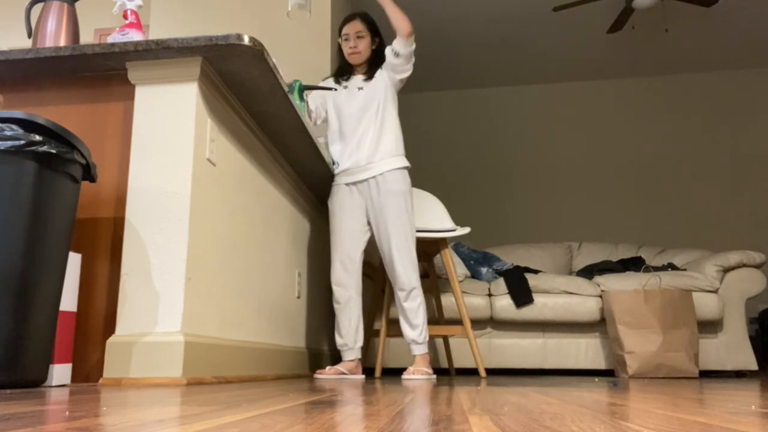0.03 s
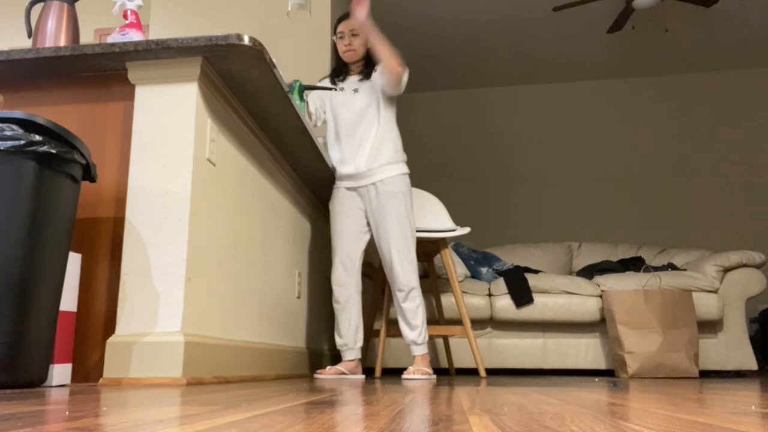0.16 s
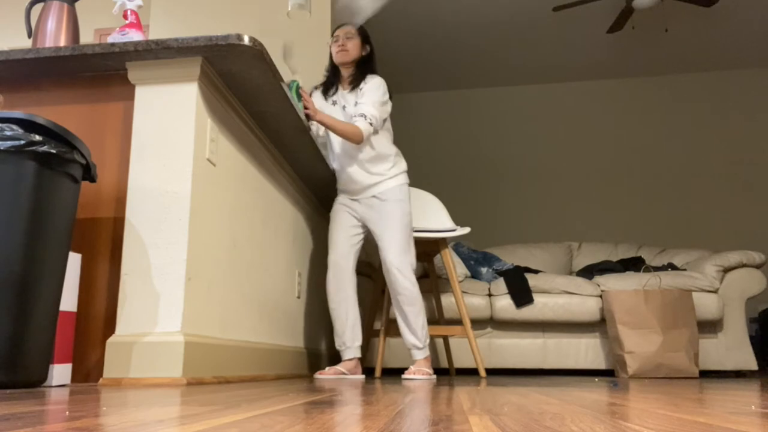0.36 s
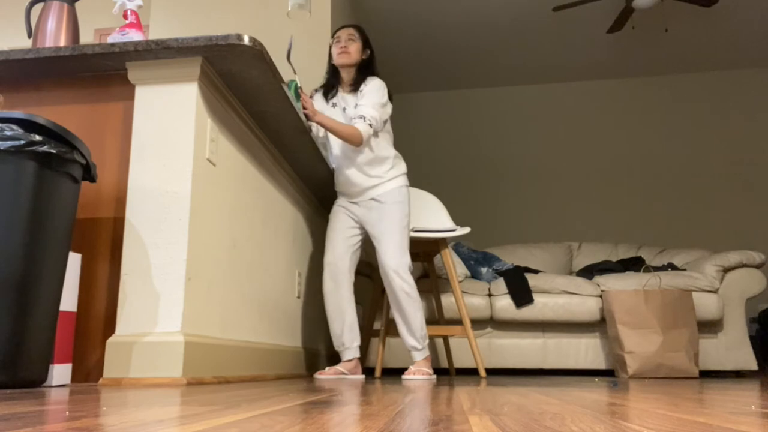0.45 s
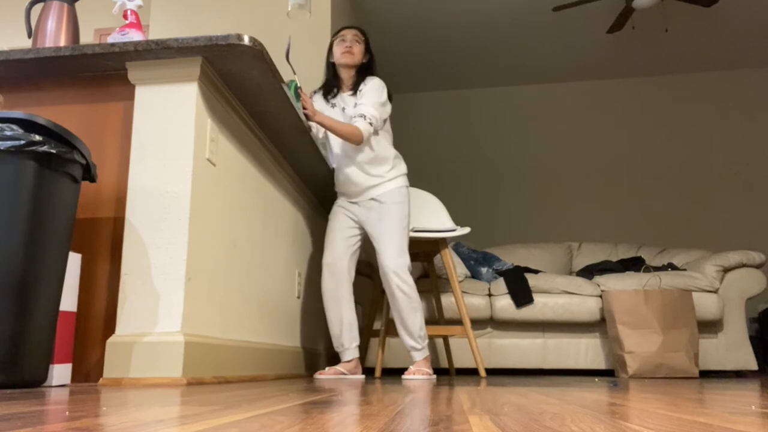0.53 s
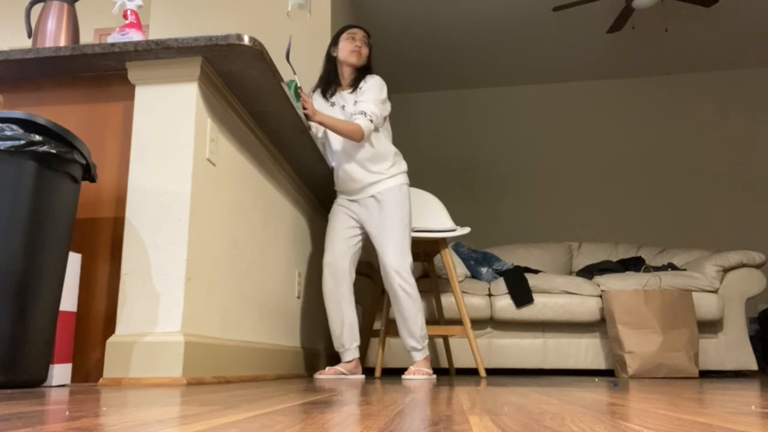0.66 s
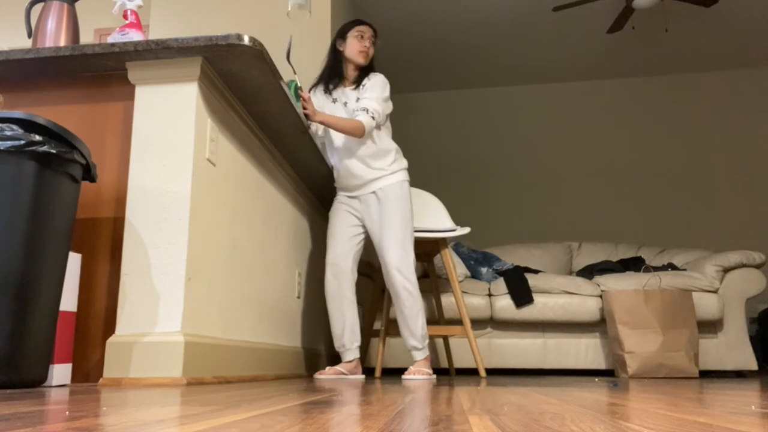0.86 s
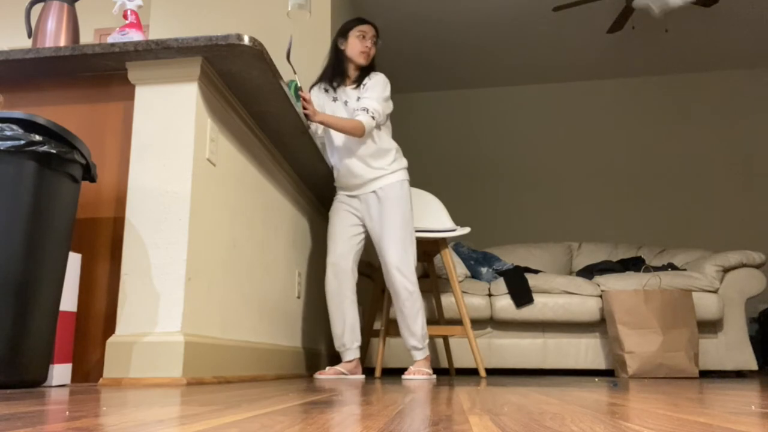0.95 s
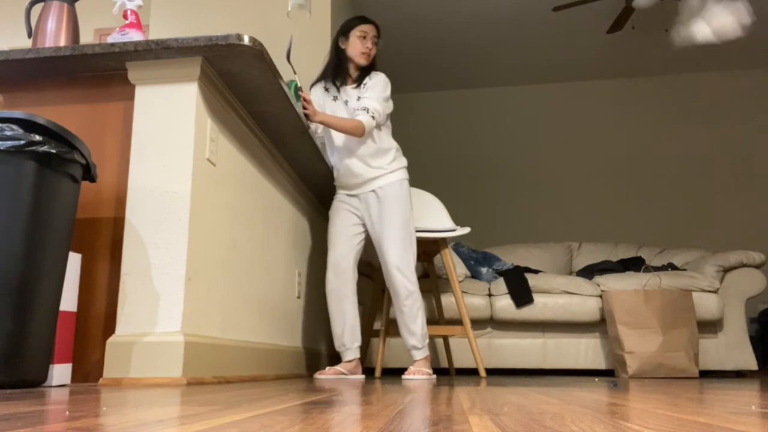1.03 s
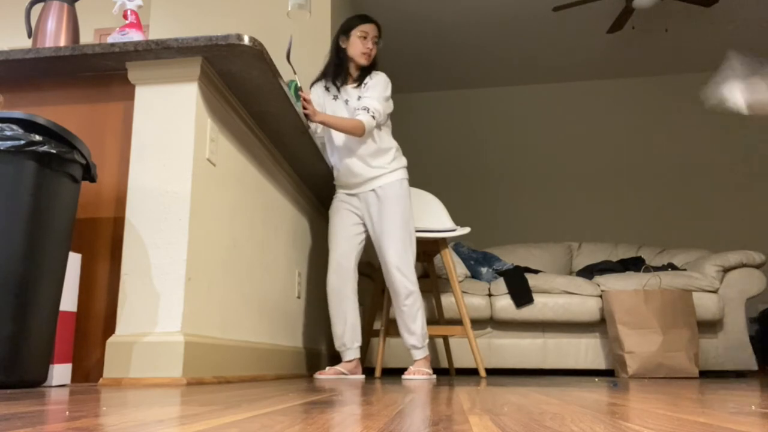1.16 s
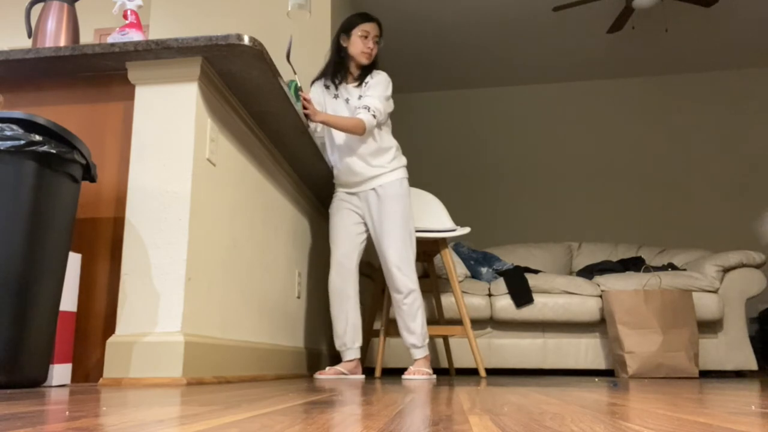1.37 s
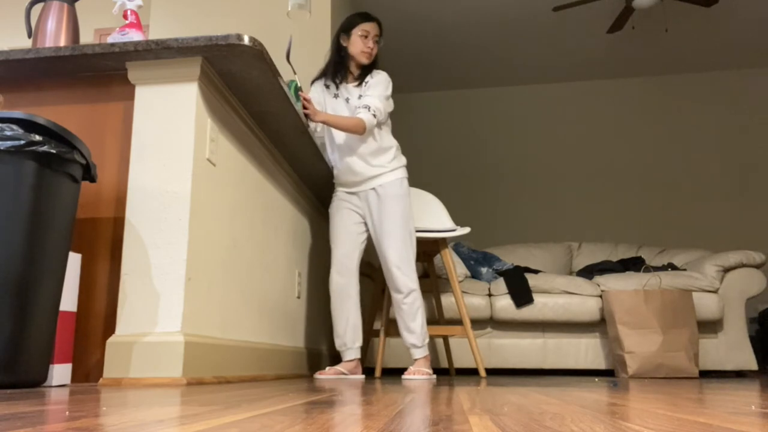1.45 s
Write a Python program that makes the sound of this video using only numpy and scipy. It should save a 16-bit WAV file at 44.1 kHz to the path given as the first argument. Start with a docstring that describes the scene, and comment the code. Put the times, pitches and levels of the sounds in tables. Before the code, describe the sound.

A booming thud of an arm hitting a counter, with a clatter, then faint taps.

```python
"""An arm lands on a kitchen counter with a booming thud that sets the hollow counter ringing.
On its way down it grazes the edge, scraping and clattering along it.
Faint taps and rustles of handling follow, over the low, beating hum of an appliance.
It all echoes in a lively living room with a wooden floor."""
import sys
import numpy as np
from scipy import signal
from scipy.fft import rfft, irfft
from scipy.io import wavfile

SR = 44100
rng = np.random.default_rng(int(sys.argv[2]) if len(sys.argv) > 2 else 0)


def master_out(mix):
    """Clip the mix to full scale and print it as 16-bit PCM to the path in sys.argv[1]."""
    frames = np.transpose(np.atleast_2d(mix))
    ceiling = np.clip(frames, -1, 1)
    pcm = np.round(ceiling * 32767).astype(np.int16)
    wavfile.write(sys.argv[1], SR, pcm)


N = 66150
FREQS = np.fft.rfftfreq(2 * N, 1 / SR)  # every tone curve has one value for each of these [Hz]


def amp(db):
    """Turns decibels into a number to multiply by."""
    return 10 ** (np.asarray(db) / 20)


def unit_power(x):
    """Scales a sound to an average power of 1."""
    return x / np.sqrt(np.mean(x ** 2) + 1e-20)


def read(points, hz=FREQS):
    """Looks up a table between its rows, spacing frequencies by octaves."""
    row_hz, value = np.transpose(points)
    return np.interp(np.log(hz + 1), np.log(row_hz + 1), value)


def since(start):
    """Seconds since a moment, zero before it."""
    return np.maximum(np.arange(N) / SR - start, 0)


def colour(x, curve_db):
    """Shapes a sound with a tone curve, so that nothing rings before the sound starts."""
    log_gain = np.log(amp(np.maximum(curve_db, -100)))
    response = np.exp(np.conj(signal.hilbert(np.r_[log_gain, log_gain[-2:0:-1]])))
    return irfft(rfft(x, 2 * N) * response[:N + 1])[..., :N]


def levelled(curve_db):
    """Shifts a tone curve to an average power of 1."""
    return curve_db - 10 * np.log10(np.mean(amp(curve_db) ** 2))


def dull(hz):
    """A soft touch loses treble above this frequency: a tone curve in dB."""
    return -10 * np.log10(1 + (FREQS / hz) ** 2)


def thin(hz):
    """A glancing touch loses bass below this frequency: a tone curve in dB."""
    return -10 * np.log10(1 + (hz / (FREQS + 1)) ** 4)


def stereo(x, likeness):
    """Blends two sounds into left and right; likeness runs from -1 (opposite) to 1 (the same)."""
    same = np.clip(read(likeness), -.99, .99)
    mid = colour(x[0], 10 * np.log10((1 + same) / 2))
    side = colour(x[1], 10 * np.log10((1 - same) / 2))
    return np.array([mid + side, mid - side])


# how long the room's echo takes to fade by 60 dB (frequency [Hz], fade time [s])
ROOM_FADE = [(60, 0.79), (250, 0.72), (600, 0.91), (1400, 0.91), (2800, 0.97), (5000, 0.96), (8000, 0.77),
             (14000, 0.38)]
# how alike left and right are in the room (frequency [Hz], likeness [-1 to 1])
ROOM_LIKENESS = [(60, 0.5), (130, 0.77), (260, 0.64), (450, 0.06), (740, -.35), (1220, -.3), (2000, -.14),
                 (3300, 0.14), (5500, 0.08), (12000, 0.18)]
def room(x, gap_s=0.0029, build_s=0.0038):
    """Countless reflections build up, then die away at each frequency's own speed."""
    hz, t, noise = signal.stft(rng.standard_normal((2, N)), SR, nperseg=1024)
    fade = amp(-60 * t / read(ROOM_FADE, hz)[:, None])
    tail = signal.istft(noise / (abs(noise) + 1e-12) * fade, SR, nperseg=1024)[1][:, :N]
    tail = stereo(tail * (1 - np.exp(-since(gap_s) / build_s)), ROOM_LIKENESS)
    return signal.fftconvolve(x[None], tail / np.linalg.norm(tail[0]), axes=1)[:, :N]


# how alike left and right are without the echo (frequency [Hz], likeness [-1 to 1])
DIRECT_LIKENESS = [(100, 0.85), (300, 0.93), (600, 0.96), (2000, 0.11), (12000, 0.62)]
def direct(x):
    """Sound that comes straight to the listener, most alike on both sides in the low range."""
    return stereo(x, DIRECT_LIKENESS)


# tone of the room's air (frequency [Hz], relative level [dB])
AIR_TONE = [(25, -17.5), (60, -6.5), (120, 5.5), (200, -6.5), (400, -13.5), (800, -20.5), (1600, -36),
            (4000, -45.5), (9000, -48.5), (15000, -77)]
def air(level_db=-50.5):
    """The room's air makes a soft, low, steady rush."""
    rush = colour(rng.standard_normal((2, N)), read(AIR_TONE))
    return amp(level_db) * unit_power(stereo(rush, ROOM_LIKENESS))


# the appliance's tones (frequency [Hz], level [dB], waver [share of the tone's strength])
HUM_TONES = [(59.06, -38.5, 0.04), (121.3, -51.5, 0.059), (108.8, -47.5, 0.03), (145.8, -57.5, 1),
             (247, -67.5, 0.33), (357.3, -65, 0.38), (416, -69, 0.086)]
def hum(slow_hz=0.69, fast_hz=5, lean_left_db=1):
    """A motor hums in wavering tones; two lie close enough to throb against each other."""
    t, tones = since(0), np.zeros(N)
    waver_rates = np.geomspace(slow_hz, fast_hz, 10)
    for hz, db, waver in HUM_TONES:
        drift = unit_power(sum(np.sin(2 * np.pi * (rate * t + rng.random())) for rate in waver_rates))
        tones += amp(db) * np.sqrt(2) * (1 + waver * drift) * np.sin(2 * np.pi * (hz * t + rng.random()))
    return tones * amp([[lean_left_db], [-lean_left_db]])


def friction(start, rise_s, decay_s, uneven_db=3):
    """Rubbing surfaces give a short burst of uneven, grainy noise."""
    t = since(start)
    grains = unit_power(rng.standard_normal((2, N)) * amp(uneven_db * rng.standard_normal(N)))
    return grains * np.minimum(t / rise_s, 1) * np.exp(-np.maximum(t - rise_s, 0) / decay_s)


# light touches (time [s], relative level [dB], rise [s], decay [s], dull above [Hz], hollow boost [dB])
TOUCHES = [(0.813, -3, 0.015, 0.03, 7860, 9), (0.828, 1, 0.0026, 0.005, 1500, 20),
           (.935, -8.5, 0.02, 0.046, 10000, -1), (1.016, -10.5, 0.018, 0.013, 9550, 7),
           (1.087, -0.5, 0.008, 0.014, 2560, 7), (1.134, 3, 0.0035, 0.0026, 12000, 5),
           (1.137, 2.5, 0.0076, 0.014, 4200, 2), (1.323, -0.5, 0.012, 0.03, 1300, 5.5),
           (1.33, -5, 0.0078, 0.008, 9000, 9)]
# tone of a touch (frequency [Hz], relative level [dB])
TOUCH_TONE = [(100, 1.5), (600, 7), (1400, -1.5), (2300, -1), (4700, -1), (6000, -4.5), (7800, 0),
              (9300, -3), (10400, -23), (12000, -6), (14000, -11), (15500, -37)]
def taps(gain_db=-50.5, room_db=2.5, hollow_hz=1486, hollow_width_hz=420):
    """Handling makes faint taps and rustles, some hollow, heard mostly through the room's echo."""
    tone = levelled(read(TOUCH_TONE))
    hollow = np.exp(-2 * ((FREQS - hollow_hz) / hollow_width_hz) ** 2)
    touches = np.zeros((2, N))
    for start, db, rise_s, decay_s, dull_hz, hollow_db in TOUCHES:
        rub = friction(start, rise_s, decay_s)
        touches += colour(rub, tone + db + dull(dull_hz) + hollow_db * hollow)
    return amp(gain_db) * (direct(touches) + amp(room_db) * room(touches[0]))


# where the counter's edge rings (frequency [Hz], width [Hz], boost [dB])
EDGE_PEAKS = [(2437, 164, 9.5), (2697, 136, 13), (3830, 210, 5), (4130, 230, 8.5), (6630, 760, 5),
              (7440, 290, 6)]
def edge():
    """The edge boosts a few bright bands of any sound made on it: a tone curve in dB."""
    return sum(db * np.exp(-2 * ((FREQS - hz) / width) ** 2) for hz, width, db in EDGE_PEAKS)


# slips along the edge (time [s], relative level [dB], rise [s], decay [s])
SLIPS = [(0.2338, -18.5, 0.00091, 0.018), (0.242, -6, 0.0062, 0.019), (0.255, -1, 0.0081, 0.0093),
         (0.27, -1.5, 0.0058, 0.0065), (0.302, -10, 0.0054, 0.042)]
# tone of the scrape (frequency [Hz], relative level [dB])
SCRAPE_TONE = [(300, -26), (1000, 2.5), (1650, 4.5), (2100, -3.5), (3200, -6), (5200, -7.5), (9300, -7),
               (10100, -31.5), (10800, -35), (11600, -12), (14000, -13.5), (15500, -30)]
def scrape(gain_db=-22.5, room_db=2):
    """The arm rubs along the edge in quick slips that bring out its bright ring."""
    slips = sum(amp(db) * friction(start, rise_s, decay_s) for start, db, rise_s, decay_s in SLIPS)
    rasp = colour(slips, levelled(read(SCRAPE_TONE) + edge()))
    return amp(gain_db) * (direct(rasp) + amp(room_db) * room(rasp[0]))


def fading_tone(t, hz, db, fade_s):
    """One tone that drops 60 dB in fade_s and reaches left and right out of step."""
    phase = np.arccos(np.clip(read(ROOM_LIKENESS, hz), -1, 1)) * np.array([[.5], [-.5]])
    return amp(db - 60 * t / fade_s) * np.sin(2 * np.pi * hz * t + phase)


# hard clinks just before the hardest blow (time [s], relative level [dB], strongest near [Hz])
CLINK_HITS = [(.2615, -29.5, 2470), (.2605, -28, 7600), (.2702, -30, 4260)]
# bright tones of the clinks (frequency [Hz], relative level [dB], fade time [s])
CLINK_TONES = [(2277, -8, .9), (2416, -10, .8), (2482, -3.5, .95), (2550, -7, .75), (2686, 1.5, 1),
               (2842, -11, .8), (3800, -8, .65), (3854, -10, .65), (4053, -10, .55), (4146, -6, .6),
               (4238, -10, .55), (6498, -13, .55), (7473, -7, .42), (7596, -11, .42)]
def clatter(reach_octaves=0.25, rise_s=0.0016, flash_db=9, flash_s=0.0057):
    """Each hard clink starts with a flash of sound, then rings on in the tones nearest its pitch."""
    clinks = np.zeros((2, N))
    for start, db, centre_hz in CLINK_HITS:
        t = since(start)
        attack = (1 - np.exp(-t / rise_s)) * (1 + amp(flash_db) * np.exp(-t / flash_s))
        for hz, tone_db, fade_s in CLINK_TONES:
            nearness = np.exp(-(np.log2(hz / centre_hz) / reach_octaves) ** 2)
            clinks += nearness * attack * fading_tone(t, hz, db + tone_db, fade_s)
    return clinks


# the hollow counter's tones (frequency [Hz], relative level [dB], fade time [s])
COUNTER_TONES = [(252, -3, .5), (301, -2, .6), (370, -1, .5), (423, -7, .6), (495, 2, .55), (563, -4, .7),
                 (590, -5, .6), (645, -5, .6), (742, -6, .85), (764, -1, .85), (818, -1, .6), (899, -6, .5),
                 (1377, -10, .7)]
def ring(gain_db=-28.5, rise_s=0.0015):
    """The hardest blow sets all of the hollow counter's tones ringing together."""
    hardest = max(ARM_BLOWS, key=lambda blow: blow[1])
    t = since(hardest[0])
    tones = sum(fading_tone(t, *row) for row in COUNTER_TONES)
    return amp(gain_db) * tones * (1 - np.exp(-t / rise_s))


# deep tones of the counter's wall (frequency [Hz], level [dB], fade time [s])
WALL_TONES = [(67.8, -18.5, 0.24), (80.2, -34.5, 0.43)]
def boom(start=0.251, rise_s=0.017):
    """The arm's weight swings the counter's wall at its two lowest tones."""
    t = since(start)
    swing = sum(amp(db - 60 * t / fade_s) * np.sin(2 * np.pi * hz * t) for hz, db, fade_s in WALL_TONES)
    return swing * np.minimum(t / rise_s, 1)


def through_slab(x, bass_lag_s=0.000915, bend_hz=500, left_lag_s=0.00004):
    """Bass travels slower through the bending countertop; the left side hears it all a little later."""
    delay_s = bass_lag_s / np.sqrt(1 + FREQS / bend_hz)
    slab_phase = 2 * np.pi * np.cumsum(delay_s) * SR / (2 * N)
    side_phase = 2 * np.pi * FREQS * np.array([[left_lag_s], [0]])
    return irfft(rfft(x, 2 * N) * np.exp(-1j * (slab_phase + side_phase)))[:, :N]


# the countertop's short-lived tones (frequency [Hz], relative level [dB])
SLAB_TONES = [(470, -6), (780, 2), (990, -7.5), (1300, -8.5), (1750, -20), (2650, -10)]
def knock(t, swell, gain_db=1):
    """The countertop's tones swell and die with a blow, making a hollow knock."""
    return swell * sum(amp(gain_db + db) * np.sin(2 * np.pi * hz * t) for hz, db in SLAB_TONES)


# the arm's blows (time [s], relative level [dB], thin below [Hz], dull above [Hz], shudder time [s])
ARM_BLOWS = [(0.2373, -9.5, 500, 1290, 0.0018), (0.2426, -5, 139, 170, 0.0055),
             (.2485, -7.5, 520, 1500, 0.0059), (.276, 2.5, 130, 2230, 0.0037),
             (.2858, -3, 262, 880, 0.0054), (.2925, -2, 470, 1020, 0.0068),
             (.3225, -14, 1100, 2200, 0.0037), (0.3323, -2.5, 1370, 2200, 0.0049),
             (0.4575, -7.5, 1170, 1970, 0.003)]
# tone of a blow (frequency [Hz], relative level [dB])
BLOW_TONE = [(40, -23.5), (85, 3.5), (175, -13), (245, -1.5), (330, -1.5), (490, 0.5), (840, 3),
             (1020, -16), (1320, -8.5), (1900, -13), (5000, -27), (15000, -54)]
def thud(gain_db=18, shudder_db=-8, push_db=-10, room_db=-4.5, edge_share=0.68):
    """Each blow gives the counter a knock, a brief shudder and a sharp push that echoes in the room."""
    shudders, pushes, knocks = np.zeros((2, N)), np.zeros(N), np.zeros(N)
    body = levelled(read(BLOW_TONE) + edge_share * edge())
    for start, db, thin_hz, dull_hz, shudder_s in ARM_BLOWS:
        t = since(start)
        contact = thin(thin_hz) + dull(dull_hz) + db
        swell = t / shudder_s * np.exp(-2 * t / shudder_s)
        push = colour(signal.unit_impulse(N, round(start * SR)), body + contact)
        shudder = colour(direct(rng.standard_normal((2, N)) * swell), body + contact)
        shudders += unit_power(shudder) * np.std(push)  # a harder push shakes it more
        pushes += push
        knocks += colour(knock(t, swell), contact)
    weight = amp(shudder_db) * shudders + amp(push_db) * through_slab(pushes)
    return knocks + amp(gain_db) * (weight + amp(room_db) * room(pushes))


def scene():
    """The arm's strike and the handling after it, over the hum and the room's air."""
    return thud() + ring() + boom() + scrape() + clatter() + taps() + hum() + air()


def record(dry, ceiling=0.8, top_hz=15700):
    """Rounds off the loudest peaks, then removes the very highest treble."""
    rounded = dry / (1 + (dry / ceiling) ** 6) ** (1 / 6)
    treble_cut = signal.firwin(511, top_hz, window=("kaiser", 9), fs=SR)
    return signal.oaconvolve(rounded, treble_cut[None], "same")


dry = scene()
out = record(dry)
master_out(out)
```